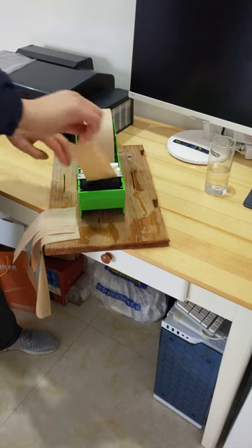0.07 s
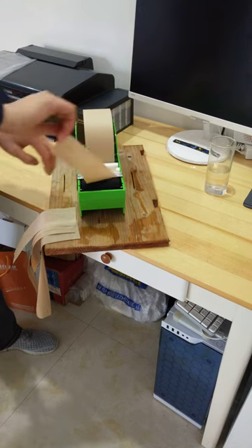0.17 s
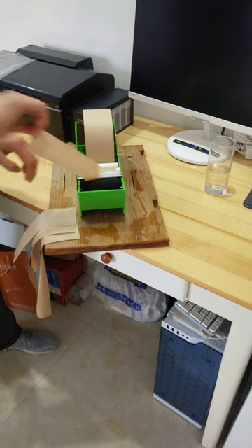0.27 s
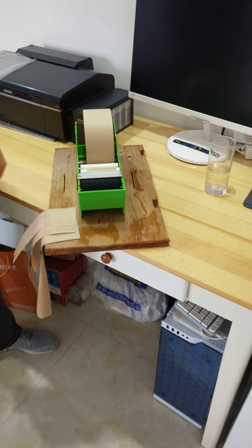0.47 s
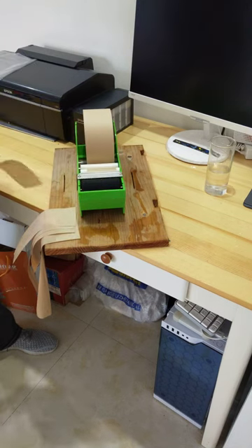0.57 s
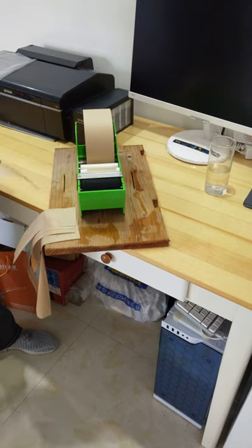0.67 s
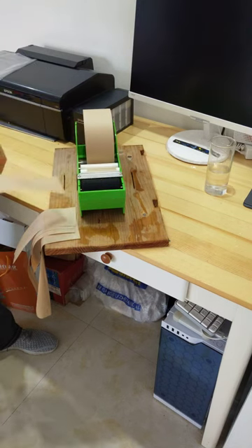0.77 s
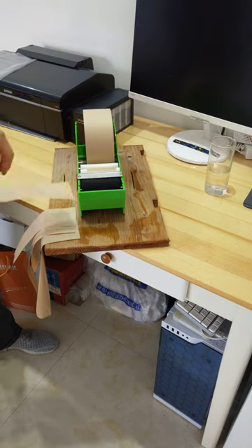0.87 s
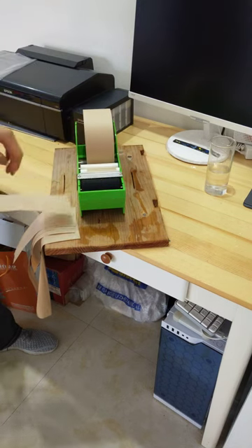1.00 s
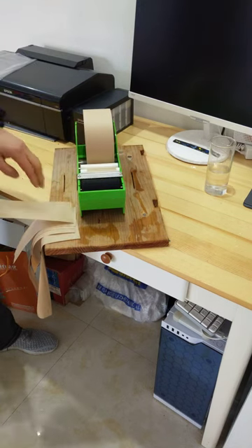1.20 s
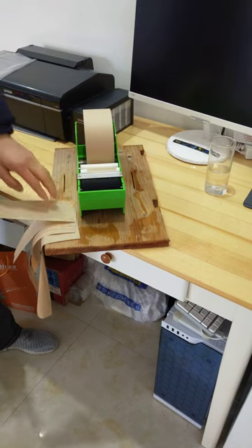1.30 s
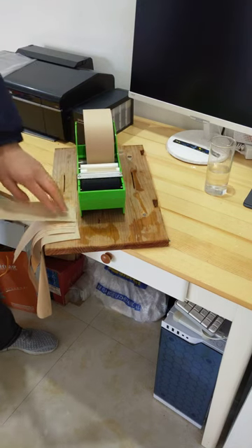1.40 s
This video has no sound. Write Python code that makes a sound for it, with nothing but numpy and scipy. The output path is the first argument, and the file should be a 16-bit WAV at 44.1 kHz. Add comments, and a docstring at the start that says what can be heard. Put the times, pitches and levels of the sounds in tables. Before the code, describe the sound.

One short, crisp tear of paper tape on a dispenser, followed by faint paper flicks.

```python
"""At a desk in a small, quiet room, gummed paper tape is pulled tight and ripped across a dispenser's cutter.
Its fibres snap in one short, dense burst that shakes the housing and the desk and sets the dispenser
ringing. The loose strip then flicks and slides as it is laid aside. Nearby surfaces and the room
add a short echo, and faint room noise runs underneath."""
import sys
import numpy as np
from scipy import signal
from scipy.fft import rfft, irfft, next_fast_len
from scipy.io import wavfile
from scipy.ndimage import map_coordinates

SR = 44100
rng = np.random.default_rng(int(sys.argv[2]) if len(sys.argv) > 2 else 0)


def int16_out(signal):
    """Quantize to a 16-bit WAV file."""
    q = np.round(np.clip(np.atleast_2d(signal).T, -1, 1) * 32767)
    wavfile.write(sys.argv[1], SR, q.astype(np.int16))


N = 63945
TIME = np.arange(N) / SR  # time of every sample [s]
FFT_SIZE = 2 * next_fast_len(N)  # extra length keeps filter tails from wrapping round to the start
FREQS = np.fft.rfftfreq(FFT_SIZE, 1 / SR)  # frequencies the filters work on [Hz]

# Tone of snapping paper fibres: (frequency [Hz], level [dB])
FIBRE_TONE = [(150, -49), (400, -16), (800, -9), (1130, -19.5), (1500, -10), (1850, -9.5), (3700, -8.5),
              (6500, -11.5), (7700, -8), (8700, -11), (10500, -20.5), (15300, -27)]
# Narrow, high ringing in each snap: (frequency [Hz], level [dB])
ZING_TONE = [(5000, -28.5), (7100, -24), (7600, 0), (8050, -7.5), (8700, -26.5), (11000, -22)]
# Low thud of the desk under the dispenser: (frequency [Hz], level [dB])
THUD_TONE = [(25, -46), (50, -25), (85, -3.5), (120, -2.5), (160, -2), (210, -2.5), (400, -26)]


def amp(db):
    """Turn decibels into a number to multiply by."""
    return 10 ** (np.asarray(db) / 20)


def unit(x):
    """Scale a signal so that its average strength (rms) is 1."""
    return x / np.sqrt(np.mean(x ** 2) + 1e-20)


def along(points, hz):
    """Read between the rows of a (frequency, value) table, on a log frequency scale."""
    freqs, values = np.transpose(points)
    return np.interp(np.log(hz + 1), np.log(freqs + 1), values)


def coloured(x, tone):
    """Give a sound the tone in a table; white noise keeps its overall level."""
    gain = unit(amp(along(tone, FREQS)))
    # Folding the cepstrum makes the filter ring only after each click, never before it.
    cepstrum = irfft(np.log(gain + 1e-6))
    cepstrum[1:FFT_SIZE // 2] *= 2
    cepstrum[FFT_SIZE // 2 + 1:] = 0
    return irfft(rfft(x, FFT_SIZE) * np.exp(rfft(cepstrum)))[..., :N]


def blend(pair, likeness):
    """Mix two unrelated channels to a set likeness: 1 is the same, 0 unrelated, -1 opposite."""
    angle = np.arcsin(np.clip(along(likeness, FREQS), -1, 1)) / 2
    spectra = rfft(pair, FFT_SIZE)
    return irfft(spectra * np.cos(angle) + spectra[::-1] * np.sin(angle))[:, :N]


def crackle(per_second, spread_db):
    """Tiny clicks at random times, each with its own strength on the left and the right."""
    clicks = rng.random(N) < per_second / SR
    sizes = amp(spread_db * np.clip(rng.standard_normal(N), -2, 2))
    sides = np.sin(2 * np.pi * rng.random((2, N)))
    return unit(clicks * sizes * sides)


def swells(strokes):
    """Loudness curve of strokes that each rise by 60 dB to a peak, then fall by 60 dB."""
    return sum(amp(db - 60 * np.maximum((peak_s - TIME) / rise_s, (TIME - peak_s) / fall_s))
               for peak_s, db, rise_s, fall_s in strokes)


def room_noise():
    """The air of the room makes a faint, steady rush."""
    # Tone of the air: (frequency [Hz], level [dB])
    air_tone = [(15, -69), (25, -24), (148, -7.5), (221, -23), (305, -19), (495, -26.5), (631, -10.5),
                (703, -29), (782, -19), (1450, -23), (2700, -21.5), (8130, -24), (15500, -43.5)]
    # How alike its left and right sides are: (frequency [Hz], likeness [-1 to 1])
    air_likeness = [(30, .4), (90, 0.88), (200, 0.54), (600, 0), (1500, .05), (10000, 0)]
    air = coloured(rng.standard_normal((2, N)), air_tone)
    return amp(-61) * unit(blend(air, air_likeness))


def room_echo(x, delay_s=.006):
    """The walls send back a wash of echoes in which the low notes last longest."""
    # How long the echo lasts: (frequency [Hz], time to fade 60 dB [s])
    fade_times = [(100, 0.82), (300, 0.44), (700, 0.54), (3000, 0.47), (8000, 0.36), (14000, 0.29)]
    hz, t, spectra = signal.stft(rng.standard_normal((2, SR)), SR, nperseg=256)
    fading = amp(-60 * t / along(fade_times, hz)[:, None])
    tail = signal.istft(spectra * fading, SR, nperseg=256)[1]
    tail = np.pad(tail / np.linalg.norm(tail[0]), ((0, 0), (int(delay_s * SR), 0)))
    return signal.fftconvolve(x, tail, axes=1)[:, :N]


def add_desk_echoes(x, echo_db=-.5, fade_s=.02, step=256):
    """Nearby surfaces smear each snap over a few milliseconds, by paths that change as the paper moves."""
    t = np.arange(SR // 20) / SR
    window = np.sin(np.pi * np.arange(2 * step) / (2 * step))
    echoes = np.zeros((2, N + len(t)))
    for start in range(0, N - 2 * step, step):
        paths = rng.standard_normal((2, len(t))) * amp(-60 * t / fade_s)
        piece = x[:, start:start + 2 * step] * window
        smeared = signal.fftconvolve(piece, paths / np.linalg.norm(paths[0]), axes=1)
        echoes[:, start:start + smeared.shape[1]] += smeared
    return (x + amp(echo_db) * echoes[:, :N]) / np.hypot(1, amp(echo_db))


def spread_left_right(x):
    """The paper's sound arrives with a slightly different tone on each side."""
    # Which side is louder: (frequency [Hz], left minus right [dB])
    balance = [(60, -0.5), (300, 3), (600, 3.5), (1300, -3), (2200, 0.5), (4500, 0), (8000, 0.5),
               (14000, -0.5)]
    # How alike the two sides are: (frequency [Hz], likeness [-1 to 1])
    paper_likeness = [(50, 1), (130, .8), (290, 0.89), (640, -0.1), (1400, -0.08), (3100, -.15),
                      (7000, 0.19), (14000, 0.014)]
    lean_db = along(balance, FREQS) / 2
    spectra = rfft(blend(x, paper_likeness), FFT_SIZE)
    return irfft(spectra * amp([lean_db, -lean_db]))[:, :N]


def hand_rubs():
    """The hands make soft, dull bumps and rubs."""
    # Each touch: (time [s], level [dB], rise [s], fall [s])
    touches = [(.135, -61.5, 0.007, 0.073), (.2, -53, 0.056, 0.11), (.8, -56.5, 0.023, 0.077),
               (.95, -58, 7.4, 2.35), (1.385, -60, 0.45, 0.28)]
    # Muffled tone of a touch: (frequency [Hz], level [dB])
    dull_tone = [(60, -20.5), (200, -6), (350, -1), (520, 5), (700, -0.5), (1000, -6.5), (3000, -27.5)]
    return coloured(swells(touches) * rng.standard_normal((2, N)), dull_tone)


def paper_rustle():
    """The loose strip crinkles in thousands of tiny clicks as it flicks and slides."""
    # Each flick or slide: (time [s], level [dB], rise [s], fall [s])
    moves = [(.175, -49.5, .04, 0.17), (.217, -41, 0.041, 0.0268), (.455, -42.5, 0.016, 0.049),
             (.523, -43.5, 0.085, 0.13), (.795, -51, 0.021, 0.08), (.99, -62.5, 0.28, 0.64),
             (1, -63.5, 7.4, 2.5)]
    # Tone of crinkling paper: (frequency [Hz], level [dB])
    paper_tone = [(200, -6.5), (600, 1.5), (1200, -2.5), (2400, 2.5), (3800, 2), (6000, -5), (7800, 1),
                  (10000, -13), (15000, -17)]
    return coloured(swells(moves) * crackle(per_second=6000, spread_db=2), paper_tone)


def dispenser_ring():
    """The shaken dispenser rings with one wavering note that lingers after the tear and echoes."""
    # Path of the ringing note: (time [s], pitch [Hz], level [dB])
    note_path = [(.215, 590, -50), (.245, 645, -27), (.283, 655, -18), (.308, 605, -24), (.35, 642, -17),
                 (.392, 635, -42), (.446, 625, -27), (.508, 626, -33), (.53, 635, -54), (.62, 635, -49),
                 (.8, 635, -66)]
    times, pitches, levels = np.transpose(note_path)
    sounding = (TIME > times[0]) & (TIME < times[-1])
    loudness = sounding * amp(np.interp(TIME, times, levels))
    phase = 2 * np.pi * np.cumsum(np.interp(TIME, times, pitches)) / SR
    note = loudness * np.sqrt(2) * np.sin(phase)
    direct = np.array([note, -amp(-13) * note])  # quieter and upside down on the right
    return direct + amp(-19) * room_echo(np.array([note, note]))


def paper_snaps(fade_s=.012):
    """The paper tightens, catches or buckles with sharp ticks."""
    # Each single snap: (time [s], level [dB])
    ticks = [(0.1165, -38.5), (0.1684, -40.5), (0.1764, -41), (0.2121, -30), (0.2183, -18), (0.2211, -11),
             (0.29, -13.5), (0.788, -44)]
    bursts = sum((TIME >= start) * amp(db - 60 * np.abs(TIME - start) / fade_s) for start, db in ticks)
    crack, zing = bursts * rng.standard_normal((2, 2, N))
    thud = amp(-13.5) * coloured(crack, THUD_TONE)
    return coloured(crack, FIBRE_TONE) + amp(-6.5) * coloured(zing, ZING_TONE) + thud


def tape_tear(start_s=.2218, end_s=.33, fade_s=.12):
    """Fibres snap along the cutter, harder as the rip crosses the strip, shaking housing and desk."""
    # Hollow tone of the shaken housing: (frequency [Hz], level [dB])
    housing_tone = [(60, -49.5), (190, -21.5), (290, -1), (380, -9.5), (470, 0), (620, 4), (900, -11.5),
                    (1150, -15.5), (1500, 2), (2200, -39.5)]
    # (tone, level halfway through its change [dB], change across the rip [dB])
    layers = [(FIBRE_TONE, -18, 5), (ZING_TONE, -24.5, -8),
              (housing_tone, -29.5, 15), (THUD_TONE, -46, 9.5)]
    progress = np.clip((TIME - start_s) / (end_s - start_s), 0, 1) ** .58  # changes fastest at first
    pull = (TIME >= start_s) * amp(-60 * np.maximum(TIME - end_s, 0) / fade_s)
    rip = np.zeros((2, N))
    for tone, db, change_db in layers:
        loudness = pull * amp(db + change_db * (progress - .5))
        rip += coloured(crackle(per_second=9000, spread_db=4) * loudness, tone)
    return rip


def scene():
    """Add up the room noise, the ringing dispenser and the paper with its echoes."""
    near = add_desk_echoes(tape_tear() + paper_snaps() + paper_rustle() + hand_rubs())
    paper = spread_left_right(near + amp(-8.5) * room_echo(near))
    return room_noise() + dispenser_ring() + paper


def record(dry, peak_limit=.85, bass_hz=23, top_hz=15900):
    """Round off the highest peaks, thin the deepest bass and remove the very top of the treble."""
    rounded = dry / (1 + np.abs(dry / peak_limit) ** 5) ** (1 / 5)
    low_cut = 1j * FREQS / (1j * FREQS + bass_hz)
    top_cut = np.sin(np.pi / 2 * np.clip((top_hz - FREQS) / 700, 0, 1)) ** 2  # closes over 700 Hz
    return irfft(rfft(rounded, FFT_SIZE) * low_cut * top_cut)[:, :N]


dry = scene()
out = record(dry)
int16_out(out)
```